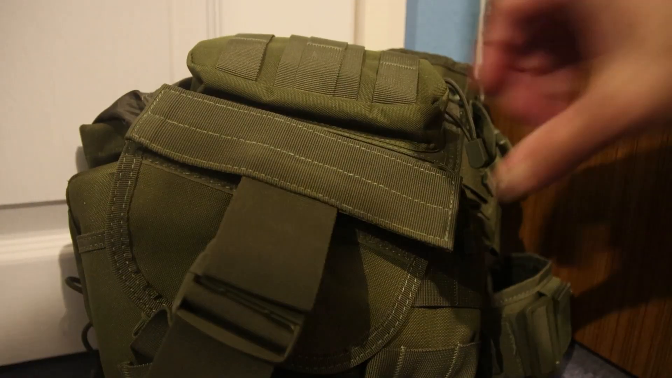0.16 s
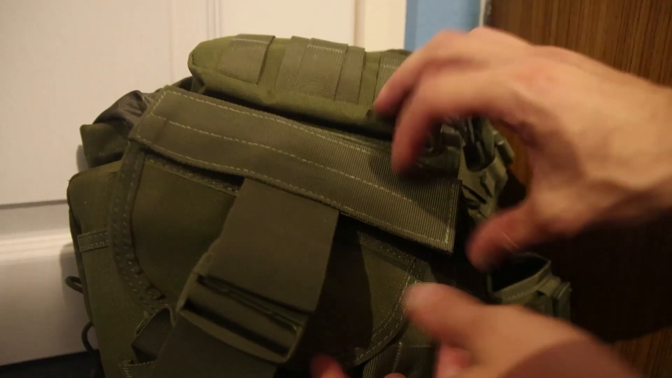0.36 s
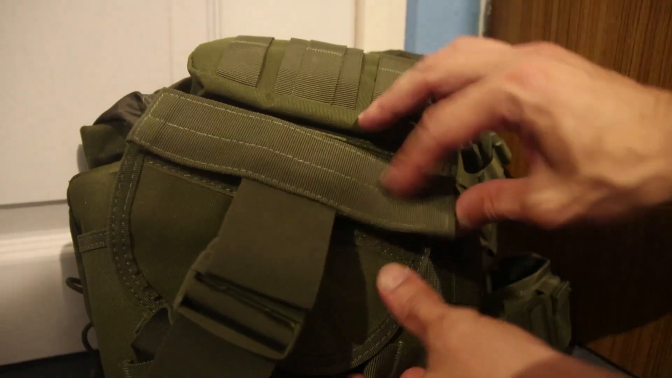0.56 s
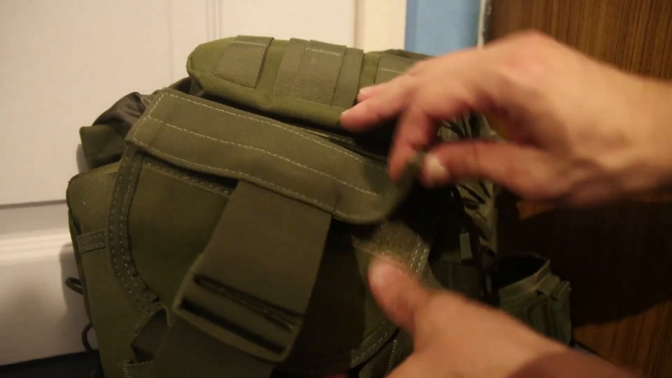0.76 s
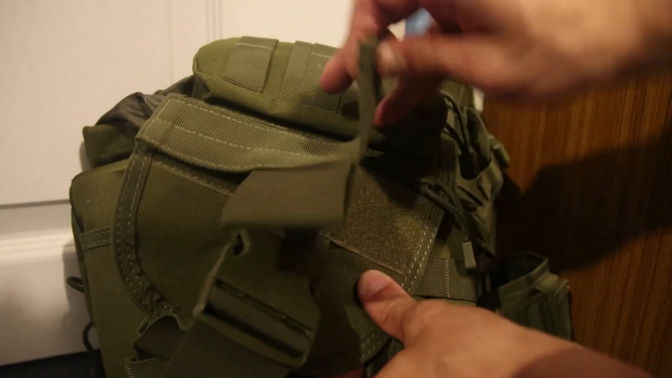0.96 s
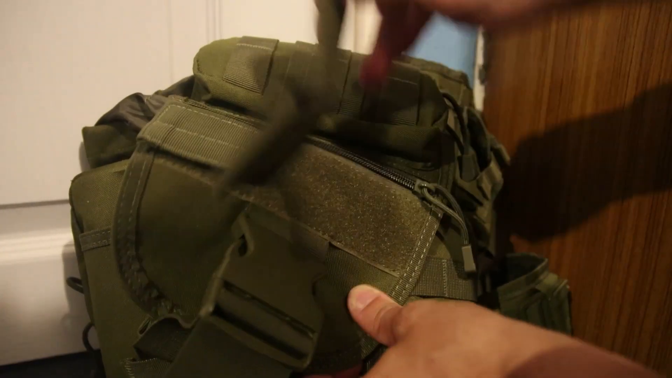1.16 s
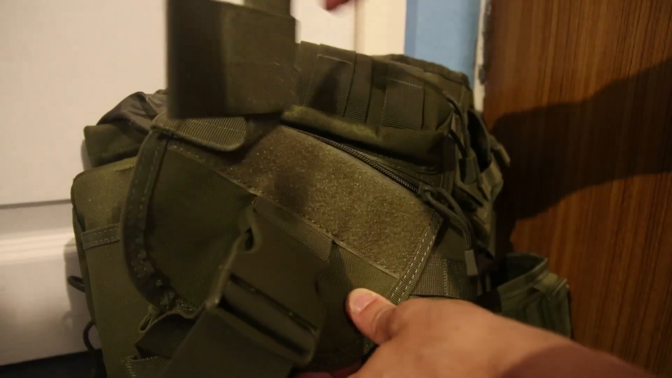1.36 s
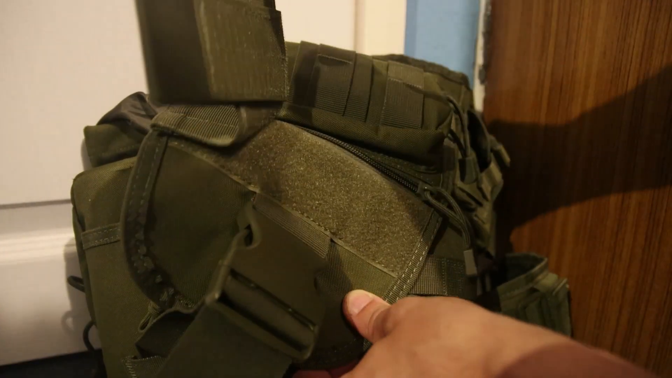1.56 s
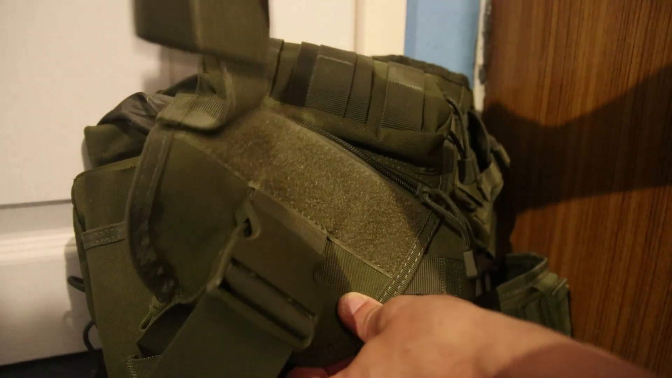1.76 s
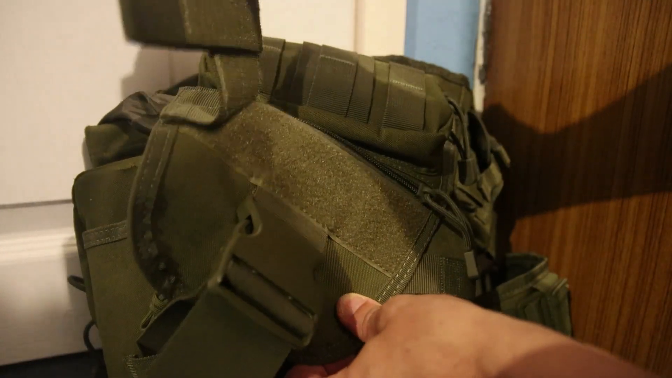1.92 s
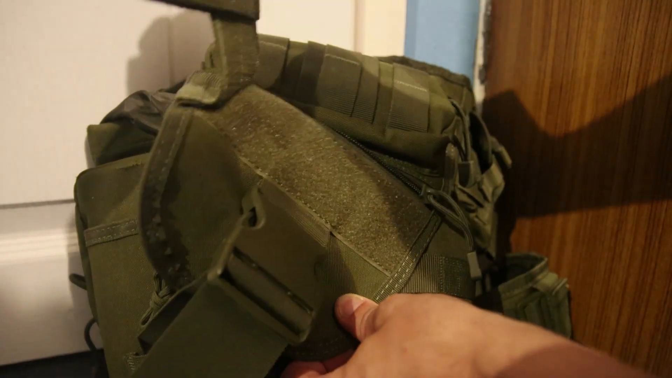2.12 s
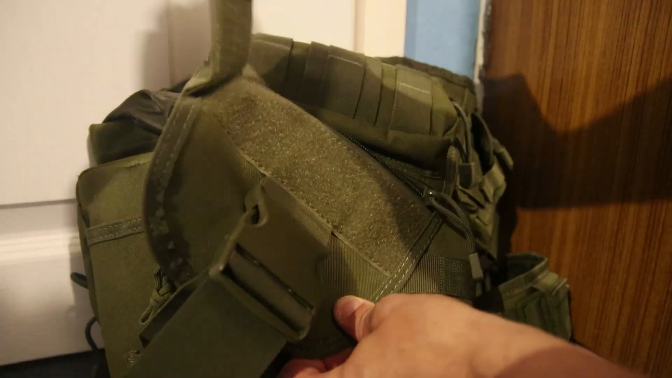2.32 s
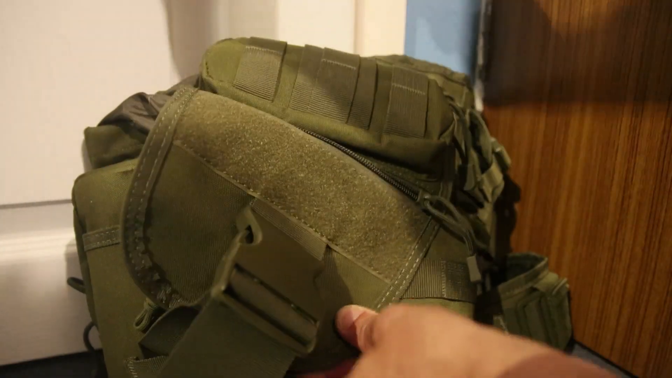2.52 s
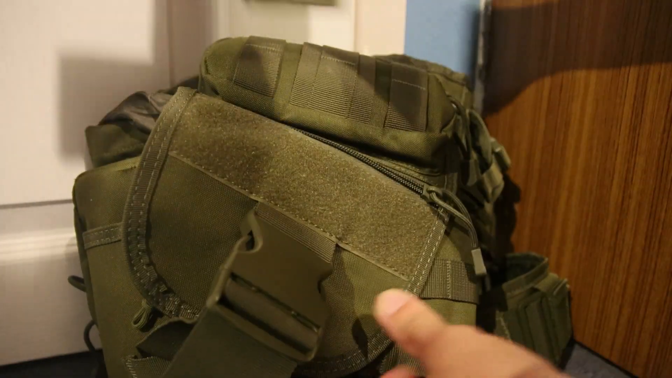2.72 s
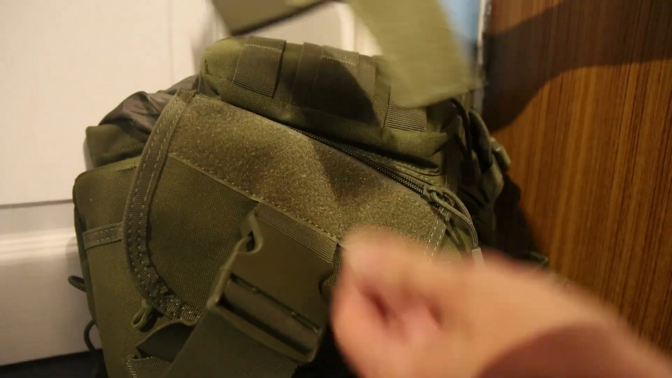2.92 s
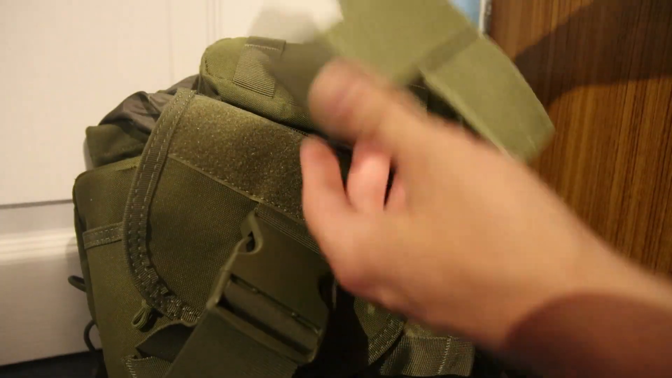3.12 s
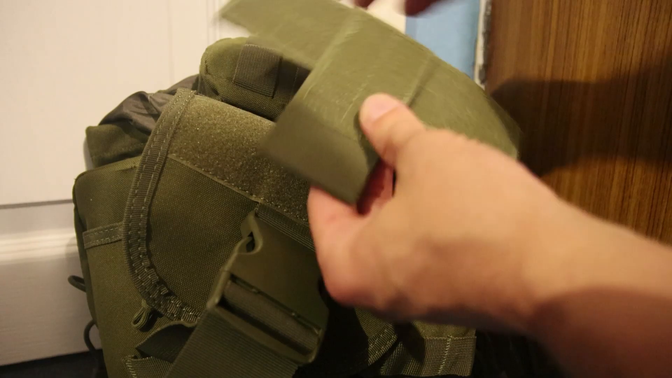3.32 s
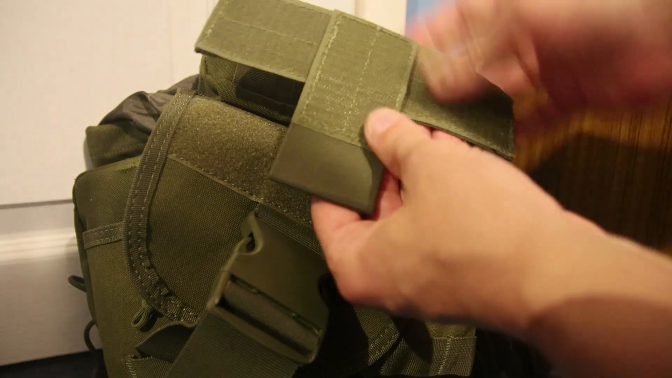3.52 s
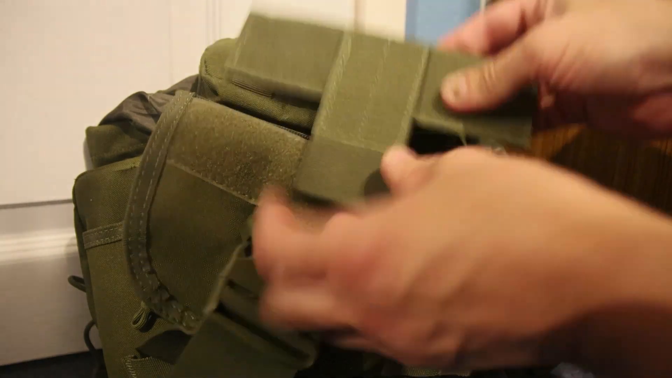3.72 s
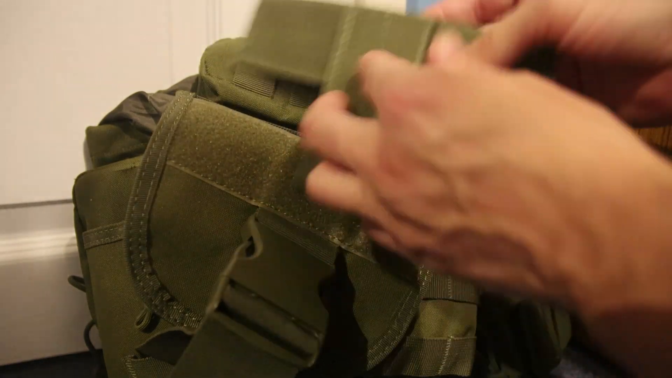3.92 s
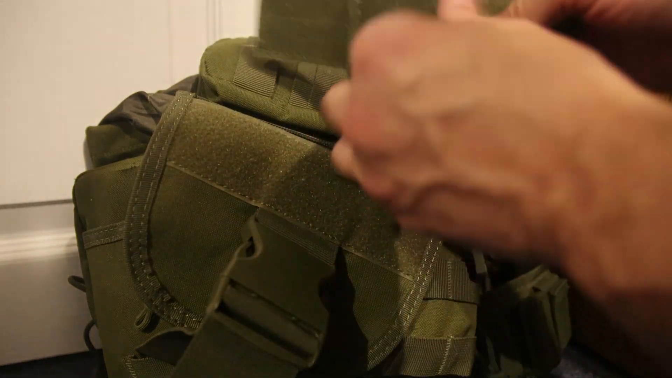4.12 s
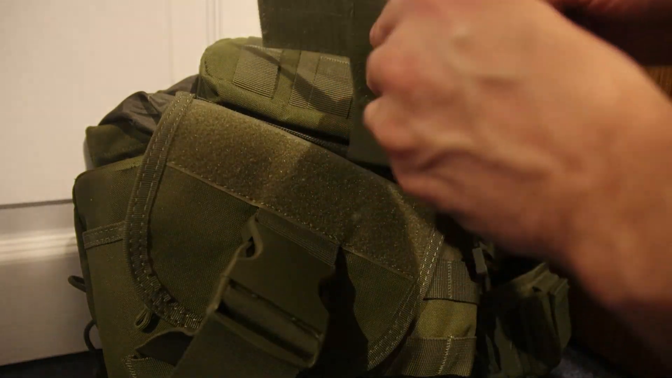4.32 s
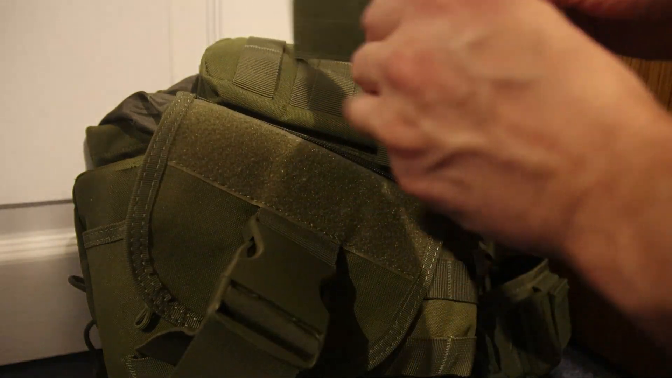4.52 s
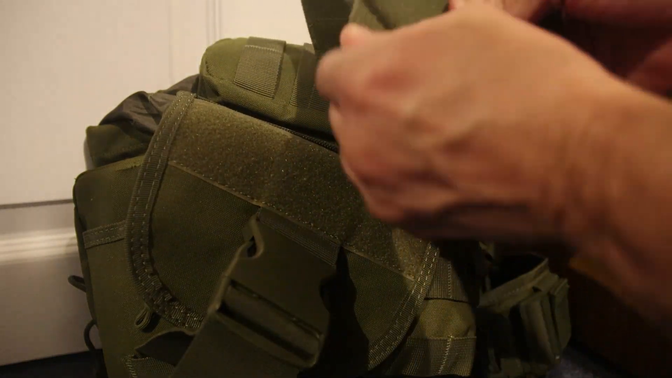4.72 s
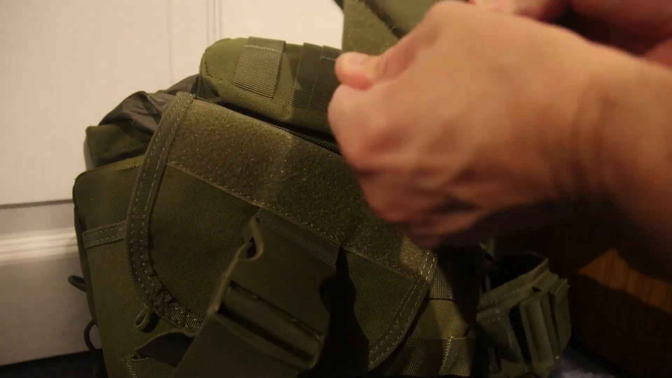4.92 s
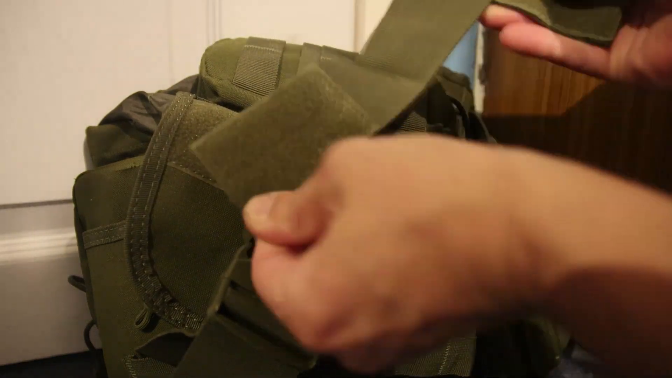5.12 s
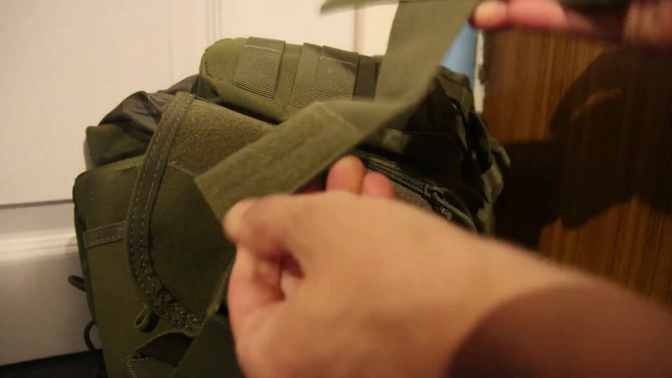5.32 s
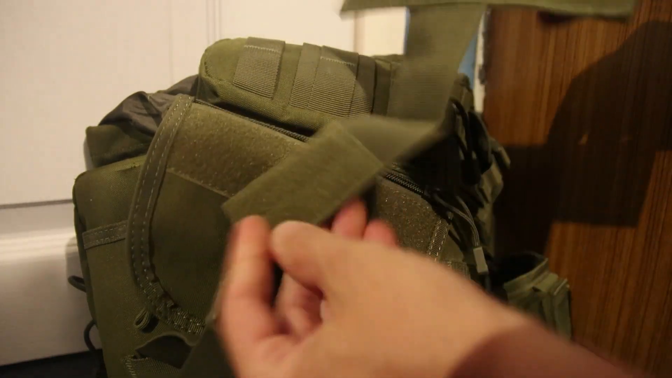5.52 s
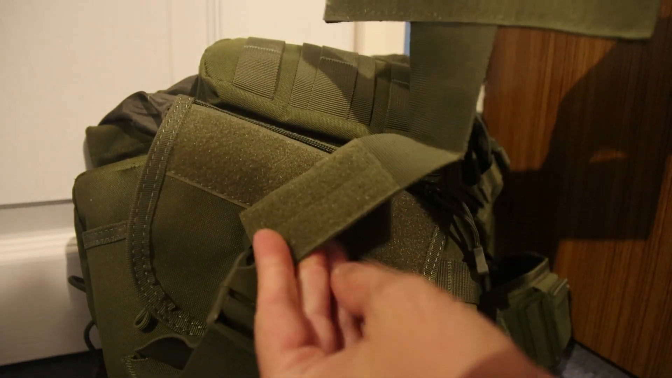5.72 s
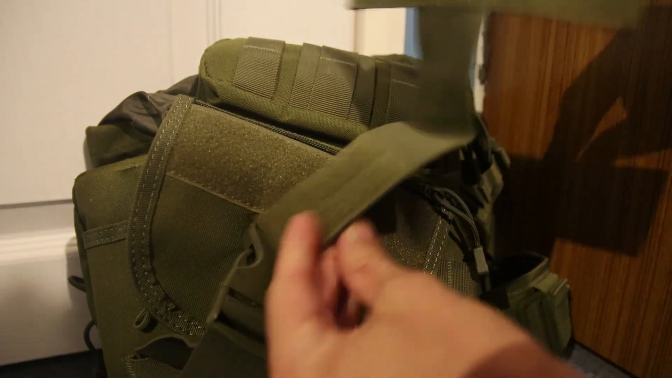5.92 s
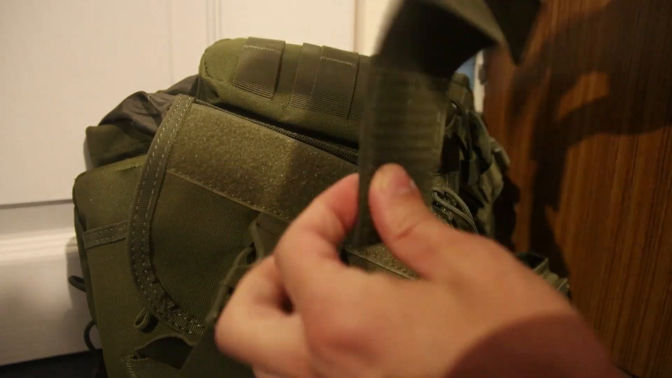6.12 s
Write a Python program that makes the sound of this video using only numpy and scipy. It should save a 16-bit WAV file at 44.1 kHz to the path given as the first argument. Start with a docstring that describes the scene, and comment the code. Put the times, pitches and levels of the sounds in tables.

```python
"""In a small room, close by, hook-and-loop tape is torn off a nylon bag in jerks, then handled and torn again.
Hooks let go as tiny random clicks, in a thin crackle and in sudden slips of whole rows.
The clicks ring the hooks, the stiff tape, the strap and the hollow bag, each a set of resonances.
Hands brush the cloth as noise and clicks, and knock on the bag as short puffs of noise.
A low hum and a hiss, both made from filtered noise, lie underneath."""
import sys
import numpy as np
from scipy import signal
from scipy.fft import rfft, irfft
from scipy.io import wavfile

SR = 44100
rng = np.random.default_rng(int(sys.argv[2]) if len(sys.argv) > 2 else 0)


def unload_audio(sound):
    """Save the sound as a 16-bit wav file, at the path given as the first command line argument."""
    columns = np.transpose(np.atleast_2d(sound))
    # keep every value between -1 and 1, then stretch to whole-number steps
    steps = np.round(np.clip(columns, -1, 1) * 32767)
    wavfile.write(sys.argv[1], SR, steps.astype(np.int16))


N = 272097  # length in samples

# Steady pulls that tear the tape open. Each row: start in seconds, length in seconds, relative level in dB.
TEARING_PULLS = [(.857, 0.1, -35.5), (1.028, 0.064, -35.5), (1.085, 0.038, -18.5), (1.135, 0.011, -15.5),
                 (1.164, 0.08, -25), (1.264, 0.065, -18), (1.408, 0.024, -16.5), (1.741, 0.063, -13.5),
                 (1.818, 0.036, -24), (1.991, .042, -12.5), (2.045, .018, -12.5), (2.26, 0.044, -16),
                 (2.307, 0.051, -14.5), (2.384, 0.035, -12), (3.242, 0.017, -25.5), (3.493, 0.09, -31.5),
                 (3.662, 0.068, -36.5), (4.485, 0.1, -27.5), (4.578, 0.048, -17.5), (4.639, 0.055, -18),
                 (4.706, 0.031, -15.5), (4.781, 0.018, -19.5), (4.81, 0.032, -14.5), (4.869, 0.053, -17.5),
                 (4.924, .04, -25.5), (4.968, 0.046, -14.5), (5.016, 0.017, -11), (5.246, 0.029, -29),
                 (5.482, 0.029, -29.5)]
# Single rows of hooks snap free. Each row: start in seconds, relative level in dB.
ROW_SNAPS = [(0.8563, -14.5), (0.871, -17), (0.896, -15), (.915, -20), (0.9524, -12), (0.98, -14.5),
             (1.0137, -14.5), (1.0225, -22), (1.035, -33), (1.048, -23), (1.061, -13), (1.084, -13),
             (1.097, -14.5), (1.112, -12), (1.154, -20), (1.171, -12), (1.201, -16.5), (1.269, -16),
             (1.319, -35), (1.403, -13.5), (1.4102, -10.5), (1.4193, -18), (1.4244, -24), (1.589, -39.5),
             (1.6217, -18), (1.6311, -10), (1.688, -7.5), (1.6986, -18), (1.725, -35), (1.799, -13),
             (1.8103, -16), (1.8389, -13.5), (1.876, -33), (1.884, -23.5), (1.888, -31), (1.91, -33),
             (1.9663, -29.5), (2.2602, -10.5), (2.266, -1), (2.29, -6.5), (2.34, -9), (2.365, -18.5),
             (2.555, -32.5), (2.612, -49), (2.67, -46), (2.706, -49), (2.8206, -45.5), (2.831, -40),
             (2.9052, -39.5), (2.9207, -37.5), (3.215, -33.5), (3.3915, -36.5), (3.429, -38.5),
             (3.497, -35), (3.512, -31), (3.528, -23), (3.542, -28), (3.56, -27), (3.58, -24.5),
             (3.742, -26), (3.9067, -36.5), (4.15, -36.5), (4.2368, -31.5), (4.348, -28.5), (4.39, -40),
             (4.5171, -16), (4.535, -15.5), (4.549, -13.5), (4.642, -11.5), (4.78, -22), (4.803, -12),
             (4.8142, -15), (4.901, -11.5), (4.915, -14.5), (4.9705, -20), (5.21, -41), (5.27, -24.5),
             (5.297, -26), (5.338, -34), (5.5, -35), (5.538, -40.5), (5.634, -44), (5.678, -35.5),
             (5.733, -43), (5.817, -43.5), (5.8696, -37.5), (5.8951, -38), (6.0977, -31)]
# How much strap and bag ring along as the grip moves.
# Each row: time in seconds, strap level in dB, bag level in dB, both against the hooks.
GRIP_CHANGES = [(0, 5.5, -35), (.25, -23.5, -21.5), (.359, 5, 7), (.8, -5, -7.5), (.9, 0, -11.5),
                (1.3, -6.5, -19), (1.77, -12.5, -17.5), (2.4, -13.5, -20), (2.601, -5, -13),
                (2.9, -20, -32), (3.1, -5.5, 8.5), (3.248, -13.5, -20), (3.4, -9.5, -4), (3.55, -23, -23.5),
                (3.751, -0.5, -5), (4.3, -7.5, -10), (4.602, -8.5, -26), (5.2, -16, -32), (5.9, 0, -7.5),
                (6.17, -14.5, -33)]
# Hands brush over cloth and webbing. Each row: middle in seconds, length in seconds, relative level in dB.
HAND_STROKES = [(0.184, 0.11, -41.5), (0.374, 0.11, -54.5), (0.494, 0.08, -47.5), (0.646, .06, -44),
                (0.787, 0.15, -41.5), (1.873, .07, -41), (1.61, 0.032, -41), (1.984, 0.026, -32),
                (2.22, 0.042, -55.5), (2.601, 0.11, -45.5), (3.03, 0.086, -62), (3.25, 0.058, -44),
                (3.43, 0.4, -50), (3.623, 0.039, -39.5), (3.732, 0.078, -42), (3.965, 0.064, -35.5),
                (4.056, 0.09, -44), (4.154, 0.055, -43), (4.247, 0.13, -43.5), (4.382, 0.074, -37),
                (4.468, 0.09, -36.5), (4.74, 0.44, -33.5), (5.087, 0.087, -43), (5.34, 0.17, -36),
                (5.427, 0.03, -29), (5.507, 0.092, -41), (5.662, 0.13, -46.5), (5.927, 0.076, -51),
                (6.003, 0.054, -29), (6.116, 0.061, -41)]
# Hand or strap knocks on the bag. Each row: start in seconds, strength in dB before mixing,
# strap drive in dB against the bag drive before mixing, strap pitch in Hz.
BAG_KNOCKS = [(0.34, -26.5, -0.5, 805), (0.735, -28.5, 7, 755), (0.873, -16.5, 4.5, 1390),
              (2.563, -18, -3, 850), (2.59, -36, 0, 905), (2.616, -36, -6, 1110), (2.998, -33.5, 0, 1680),
              (3.726, -28.5, 17, 1020), (3.74, -24.5, 6, 1990), (3.95, -27, -9, 1010),
              (4.35, -27, -1, 1000), (4.505, -23, 8.5, 1860), (5.43, -29.5, 6, 1470)]
# Broad resonances of the hooks, the stiff tape, the strap and the hollow bag.
# Each row: center in Hz, width of one filter pass in Hz, relative level in dB.
HOOK_MODES = [(5970, 3800, -14), (8100, 4520, -1), (10060, 3700, -1), (12580, 4200, -1.5),
              (15600, 970, -29)]
TAPE_MODES = [(2604, 490, -5), (3710, 1780, 3), (4810, 3200, -0.5)]
STRAP_MODES = [(1105, 460, -1.6), (1467, 490, 1), (2010, 2000, -0.61)]
BAG_MODES = [(113.5, 92, -9), (213.6, 125, -1), (295, 152, 2), (513, 580, -6.5), (917, 564, -5.5)]
# Soft bands of the background hum. Each row: center in Hz, width of one filter pass in Hz, relative level in dB.
HUM_BANDS = [(177, 11, 0), (298.3, 19, 0.5), (525, 72, -5.5), (649.6, 15.6, 4)]
# Tone color of the hiss. Each row: frequency in Hz, relative level per Hz in dB.
HISS_COLOR = [(24, -30.5), (40, -12), (180, -1.5), (444, -6), (646, -9.5), (852, -9.5), (12500, -26.5),
              (16000, -42.5)]
# Time the room tail takes to fall by 60 dB. Each row: frequency in Hz, time in seconds.
ROOM_FADE_TIMES = [(200, 0.23), (15000, 0.17)]

# During a pull, rows catch and let go at random, on top of the even tearing.
JUDDER_PER_S, JUDDER_FADE_S, JUDDER_DB = 130, 0.0032, 2
# The load builds up, so a pull swells in and its first crack is softer.
PULL_ATTACK_S, PULL_CRACK_DB = 0.0029, -6
PULL_CRACKLE_DB, PULL_RELEASE_S = -8.5, 0.0034  # loose crackle under a pull, and how it trails off
SNAP_S = 0.0026  # how long a snap holds
TAPE_DB, TAPE_FOLLOWS = 2.5, 0.61  # the tape follows the strap: offset in dB, share of its swing
STROKE_EDGE_DB, STILL_DB = -5, -65  # ends of a stroke against its middle; cloth at rest
CUTOFF_HZ = 16400  # the top is cut from here up


def fastener():
    """Slips and cloth rustle ring four parts of tape and bag; rustle drives strap and bag harder."""
    times, *levels = np.transpose(GRIP_CHANGES)
    strap_db, bag_db = [np.interp(np.arange(N) / SR, times, level) for level in levels]
    tape_db = TAPE_DB + TAPE_FOLLOWS * strap_db

    cloth = from_db(-5) * rustle()
    flutter = from_db(1.86 * drift(280))
    rows = slips(fade_s=0.00082) * flutter * hook_clicks(per_s=16000, spread_db=1.77)
    rows = from_db(-3.5) * rows + from_db(12) * first_hooks(after_s=0.00053)

    bright = two_sides(cloth + rows, lag_s=0.00004, wander_s=0.00005, wander_db=3.5, rate_hz=10.5)
    # Strap and bag are wide, so their drive wanders further in time.
    dull = two_sides(from_db(6.5) * cloth + rows, lag_s=0, wander_s=0.00013, wander_db=2, rate_hz=13)

    hooks = body(bright, HOOK_MODES) * from_db([[0.9], [-0.9]])  # more hook treble on the left
    tape = body(from_db(tape_db + 0.65 * drift(74)) * bright, TAPE_MODES)
    strap = body(from_db(strap_db + 2.55 * drift(40)) * dull, STRAP_MODES)
    bag = body(from_db(bag_db) * dull, BAG_MODES)
    return hooks + tape + strap + bag


def slips(fade_s):
    """Loudness curve of rows of hooks that let go in juddering pulls and in lone snaps."""
    keep = np.exp(-1 / (JUDDER_FADE_S * SR))
    catches = rng.exponential(1, N) * (rng.random(N) < JUDDER_PER_S / SR)
    bursts = signal.lfilter([1], [1, -keep], catches)
    judder = 1 + from_db(2 * JUDDER_DB) * bursts  # in power, so dB are doubled

    pulls = held(TEARING_PULLS, fade_s)
    rise = np.exp(-1 / (PULL_ATTACK_S * SR))
    swelling = signal.lfilter([1 - rise], [1, -rise], pulls)
    pulls = np.minimum(pulls, swelling) * judder / judder.mean()

    snaps = held([(start, SNAP_S, db) for start, db in ROW_SNAPS], fade_s)
    return np.sqrt(pulls + snaps)


def first_hooks(after_s):
    """The first hook of every pull and snap carries the full load and gives one sharp crack."""
    pull_cracks = [(start, db + PULL_CRACK_DB) for start, _, db in TEARING_PULLS]
    start, level_db = np.transpose(pull_cracks + ROW_SNAPS)
    cracks = np.zeros(N)
    cracks[((start + after_s) * SR).astype(int)] = from_db(level_db) * rng.choice([-1, 1], len(start))
    return cracks


def hook_clicks(per_s, spread_db):
    """Hooks let go at random moments, as single-sample clicks of uneven size."""
    sizes = from_db(spread_db * np.minimum(rng.exponential(1, N), 5))
    happens = rng.random(N) < per_s / SR
    return rms_one(sizes * happens * rng.standard_normal(N))


def rustle():
    """A light touch slides smoothly over the cloth; a harder pull breaks it up into clumped clicks."""
    level_db = cloth_level()
    pull = np.clip((level_db + 51.5) / 16, 0.15, 1)  # how hard the cloth is worked, from the level
    clumps = from_db(pull * (1.46 * drift(49) + 1.3 * drift(190)))
    clicks = hook_clicks(per_s=4000, spread_db=3.0)
    smooth = rng.standard_normal(N)
    strays = from_db(-14.5) * hook_clicks(per_s=34, spread_db=2.0)  # lone hooks catch now and then
    grain = np.sqrt(pull) * clicks + np.sqrt(1 - pull) * smooth + strays
    return from_db(level_db) * clumps * grain


def cloth_level():
    """Strokes swell and fade, and every pull adds its crackle; the result is in dB."""
    t = np.arange(N) / SR
    strokes = 0
    for middle, length_s, db in HAND_STROKES:
        from_middle = 2 * (t - middle) / length_s  # -1 and 1 at the ends
        strokes = strokes + from_db(2 * (db + STROKE_EDGE_DB * from_middle ** 2))
    crackle = from_db(2 * PULL_CRACKLE_DB) * held(TEARING_PULLS, PULL_RELEASE_S)
    return 10 * np.log10(strokes + crackle + from_db(2 * STILL_DB))


def knocks(contact_s, ring_width_hz):
    """A soft blow is a fading puff of noise into low bag modes; the strap rings at its own pitch."""
    bag, strap = np.zeros((2, N))
    t = np.arange(SR // 8) / SR
    for start, strength_db, strap_db, hz in BAG_KNOCKS:
        first = int(start * SR)
        puff = from_db(strength_db) * np.exp(-t / contact_s) * rng.standard_normal(len(t))
        bag[first:][:len(t)] += puff
        strap[first:][:len(t)] += from_db(strap_db) * body(puff, [(hz, ring_width_hz, 0)])
    return from_db(-6.5) * body(bag, BAG_MODES[:4]) + from_db(-10.5) * strap


def room(x, first_echo_s):
    """A dense noise tail that dies faster in the treble, a different one for each side."""
    t = np.arange(SR // 2) / SR
    tail = 0
    edges = np.geomspace(60, 18000, num=9)
    for low, high in zip(edges, edges[1:]):
        band_filter = signal.butter(2, [low, high], "band", fs=SR, output="sos")
        band = signal.sosfilt(band_filter, rng.standard_normal((2, len(t))))
        fade_time = at_hz(ROOM_FADE_TIMES, np.sqrt(low * high))
        tail = tail + band * from_db(-60 * t / fade_time)
    tail = tail * (t > first_echo_s)
    tail = tail / np.sqrt(np.sum(tail ** 2) / 2)
    return signal.fftconvolve(x, tail, axes=1)[:, :N]


def background():
    """Noise shaped into a smooth hiss and a few soft hum bands, much alike on both sides."""
    hz = np.fft.rfftfreq(N, 1 / SR) + 1  # the 1 avoids log of zero
    spectrum = rfft(rng.standard_normal((2, N))) * from_db(at_hz(HISS_COLOR, hz))
    hiss = rms_one(irfft(spectrum, N))
    hum = body(rng.standard_normal((2, N)), HUM_BANDS)
    middle, side = from_db(-57.0) * hiss + from_db(-59.0) * hum
    return middle + from_db(-7.5) * side * [[1], [-1]]


def two_sides(x, lag_s, wander_s, wander_db, rate_hz):
    """The sounding spot wanders along the tape, so lag and level change between left and right."""
    lag = np.round((lag_s + wander_s * drift(rate_hz)) * SR).astype(int)
    lean = from_db(wander_db * drift(rate_hz))
    left = lean * x[np.clip(np.arange(N) - lag, 0, N - 1)]
    return np.array([left, x / lean])


def body(drive, modes):
    """Side-by-side resonances, each applied twice for steep skirts; unit noise in gives unit noise out."""
    out, response = 0, 0
    for k, (hz, width_hz, level_db) in enumerate(modes):
        r = np.exp(-np.pi * width_hz / SR)
        stage = [(1 - r * r) / 2, 0, (r * r - 1) / 2, 1, -2 * r * np.cos(2 * np.pi * hz / SR), r * r]
        gain = (-1) ** k * from_db(level_db)  # signs alternate between neighbors
        out = out + gain * signal.sosfilt([stage, stage], drive + 1e-18)
        response = response + gain * signal.sosfilt([stage, stage], signal.unit_impulse(4096))
    return out / np.sqrt(np.sum(response ** 2))


def held(rows, fade_s):
    """Power of (start s, length s, dB) events: each starts at once, holds and dies quickly."""
    power = np.zeros(N)
    for start, length_s, level_db in rows:
        end = start + max(length_s, 2 / SR)
        power[int(start * SR):int(end * SR)] += from_db(2 * level_db)
    keep = np.exp(-1 / (fade_s * SR))
    return np.maximum(power, signal.lfilter([1 - keep], [1, -keep], power))


def drift(rate_hz):
    """Smoothed noise that wanders at random, with rms 1."""
    r = np.exp(-2 * np.pi * rate_hz / SR)
    noise = rng.standard_normal(N + 9000)
    return rms_one(signal.lfilter([1], [1, -2 * r, r * r], noise)[9000:])  # drop the settling start


def at_hz(points, hz):
    """Read (Hz, value) rows along a log-frequency axis."""
    point_hz, values = np.array(points).T
    return np.interp(np.log(hz), np.log(point_hz), values)


def rms_one(x):
    """Scale to rms 1."""
    return x / np.sqrt(np.mean(x ** 2) + 1e-20)


def from_db(db):
    """Turn decibels into gain."""
    return 10 ** (np.asarray(db) / 20)


def scene():
    """Fastener, knocks, room and background together, a little louder on the right."""
    near = fastener() + knocks(contact_s=0.011, ring_width_hz=600)
    echoes = from_db(-13.5) * room(near, first_echo_s=0.0047)
    return (near + echoes + background()) * from_db([[-0.8], [0.8]])


def record(dry):
    """Peaks beyond 0.8 are clipped flat, then a steep low-pass cuts the top."""
    clipped = np.clip(dry, -0.8, 0.8)
    low_pass = signal.cheby2(18, 70, CUTOFF_HZ, fs=SR, output="sos")  # 70 dB down above the cutoff
    return signal.sosfilt(low_pass, clipped)


dry = scene()
out = record(dry)
unload_audio(out)
```